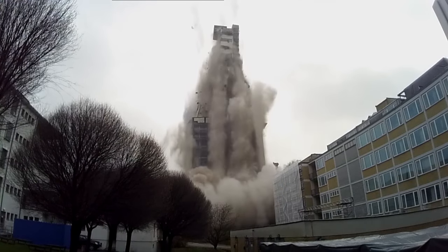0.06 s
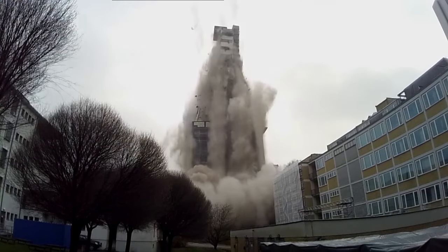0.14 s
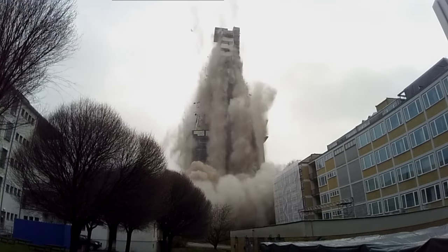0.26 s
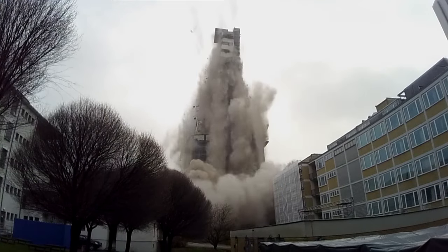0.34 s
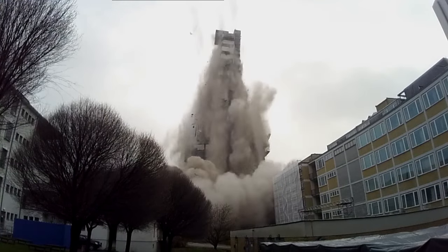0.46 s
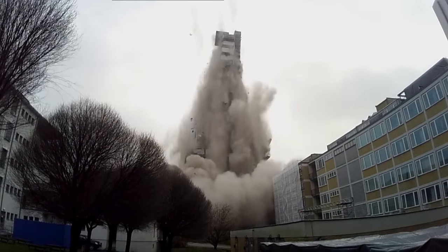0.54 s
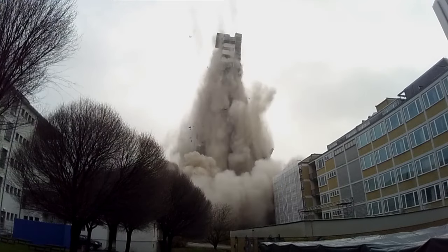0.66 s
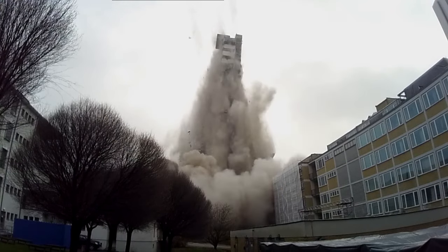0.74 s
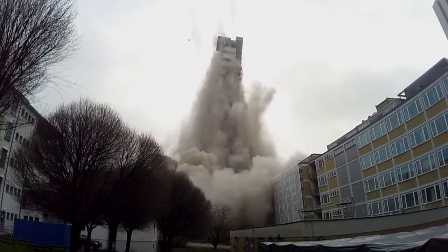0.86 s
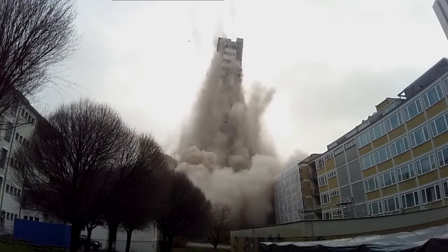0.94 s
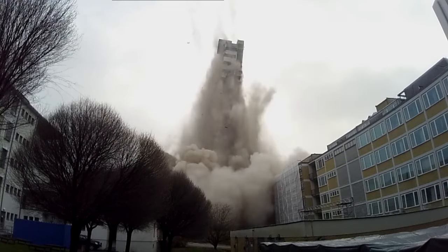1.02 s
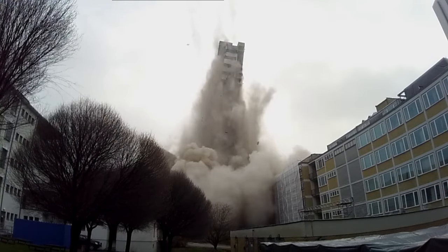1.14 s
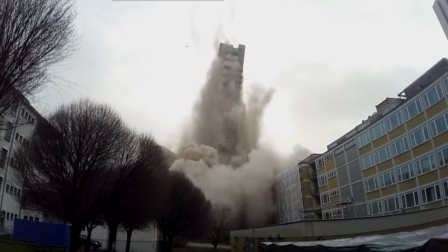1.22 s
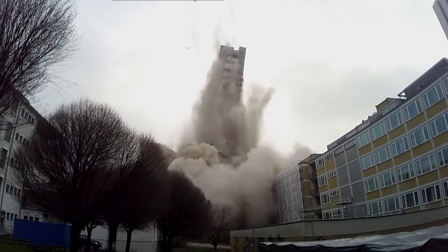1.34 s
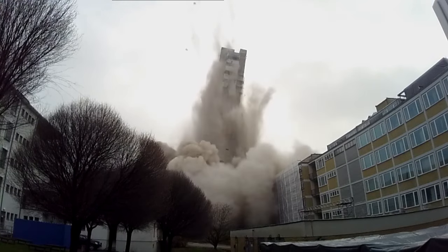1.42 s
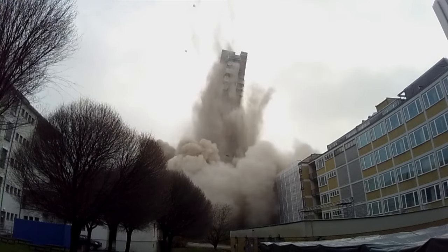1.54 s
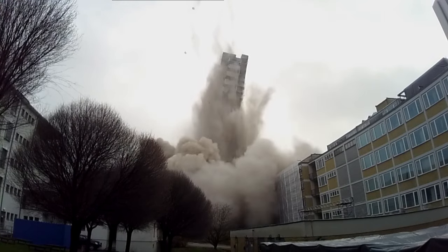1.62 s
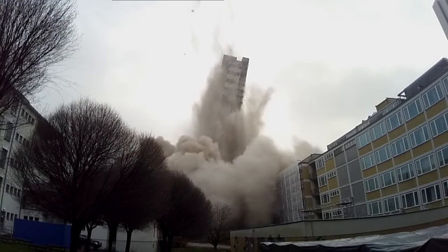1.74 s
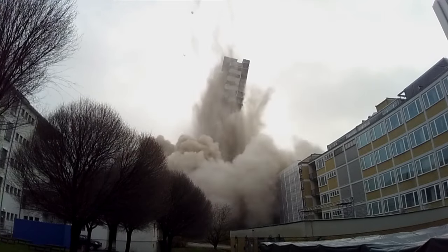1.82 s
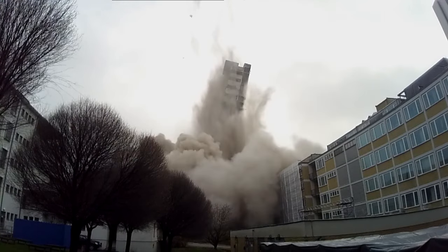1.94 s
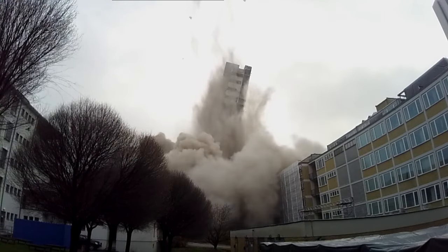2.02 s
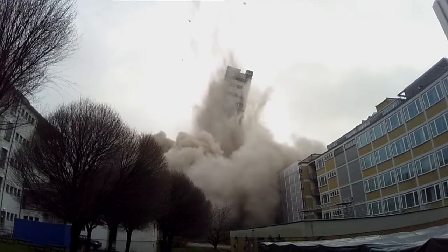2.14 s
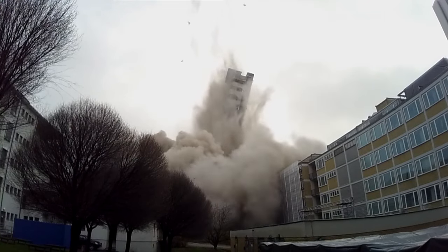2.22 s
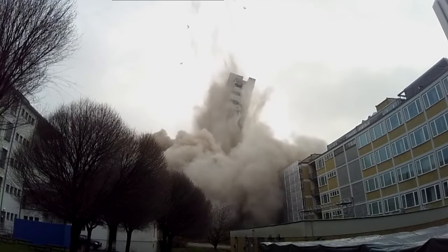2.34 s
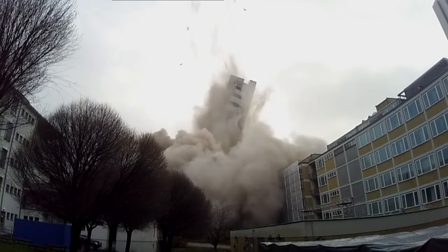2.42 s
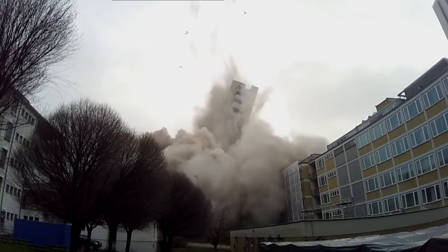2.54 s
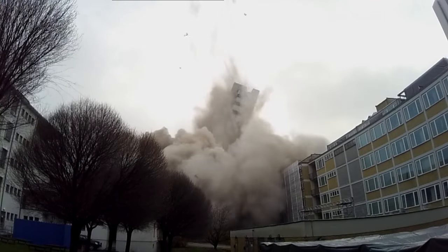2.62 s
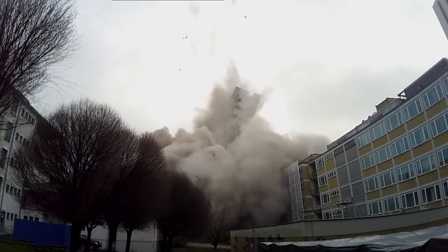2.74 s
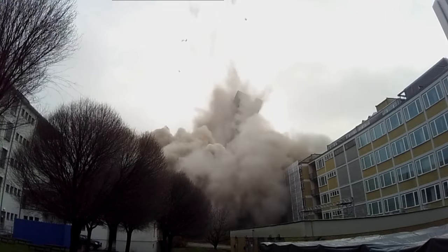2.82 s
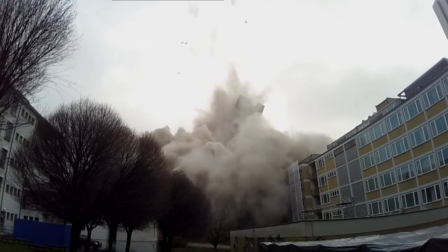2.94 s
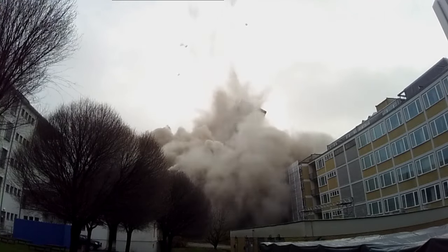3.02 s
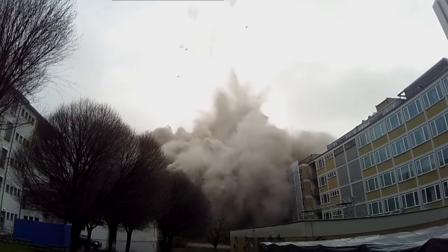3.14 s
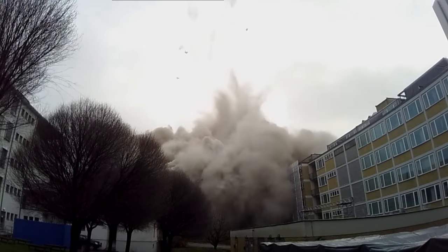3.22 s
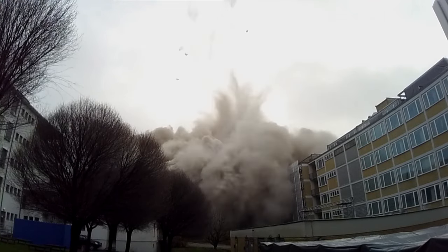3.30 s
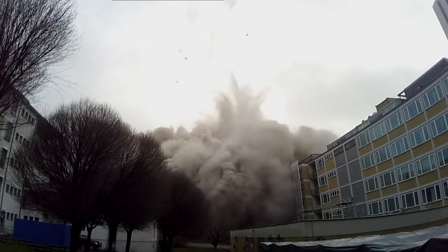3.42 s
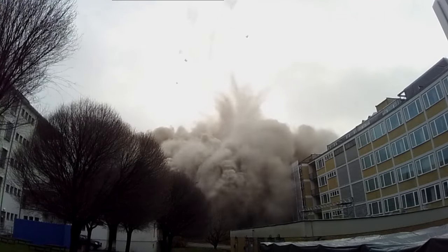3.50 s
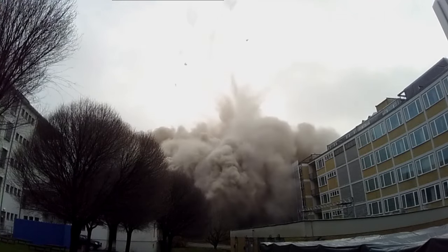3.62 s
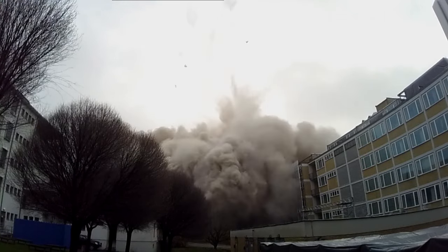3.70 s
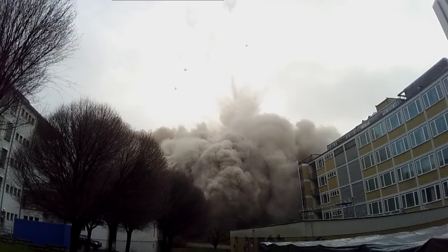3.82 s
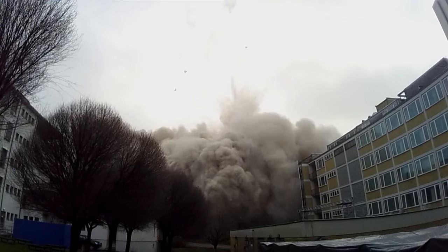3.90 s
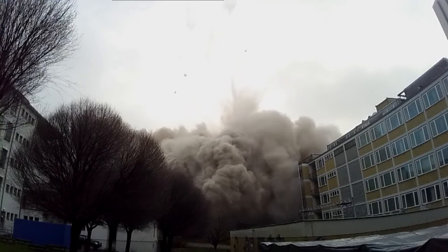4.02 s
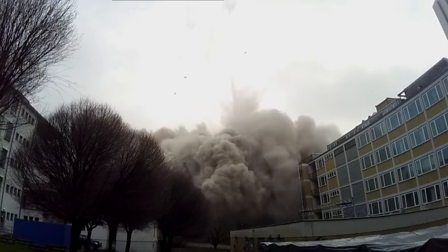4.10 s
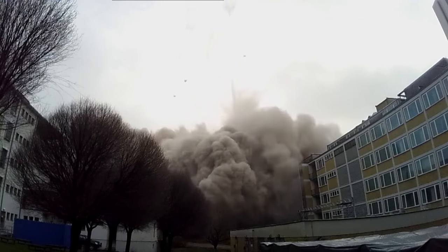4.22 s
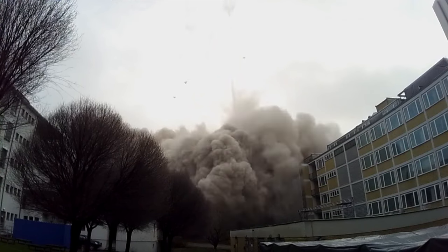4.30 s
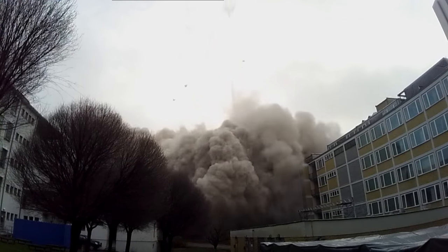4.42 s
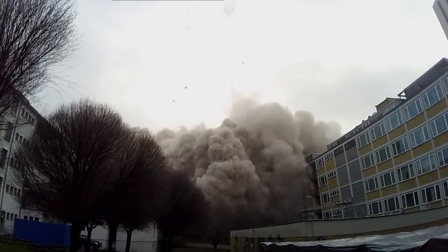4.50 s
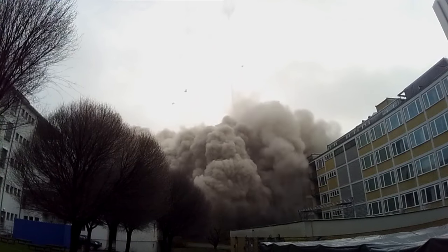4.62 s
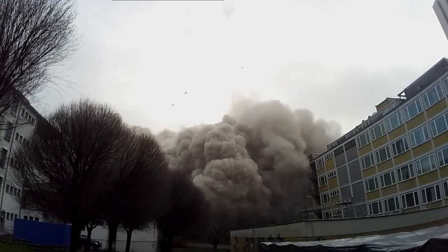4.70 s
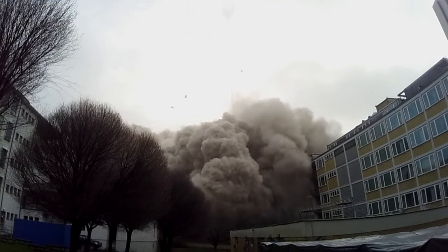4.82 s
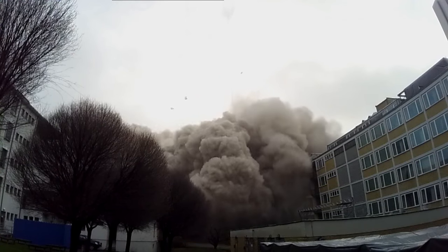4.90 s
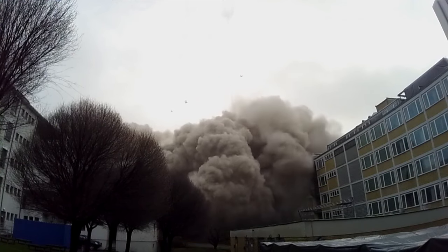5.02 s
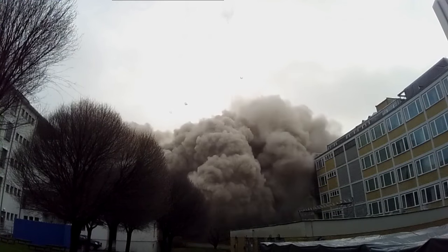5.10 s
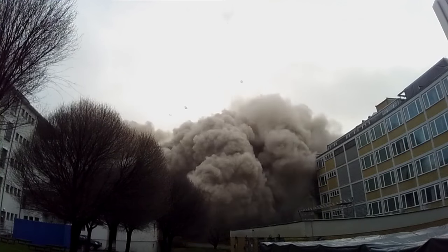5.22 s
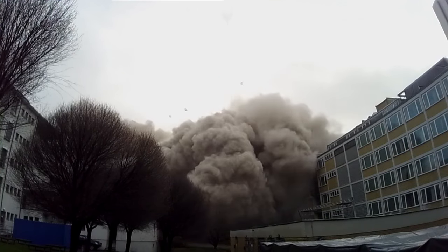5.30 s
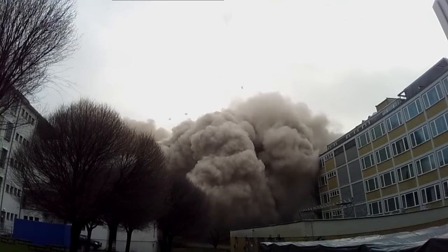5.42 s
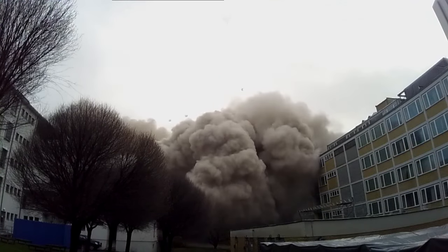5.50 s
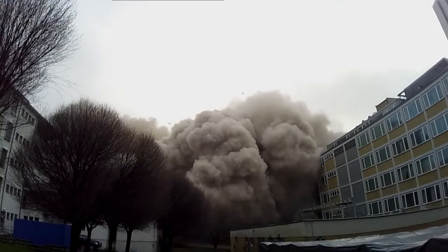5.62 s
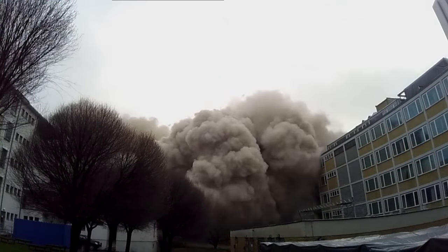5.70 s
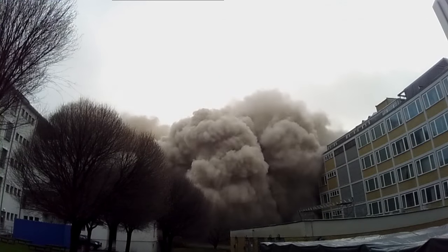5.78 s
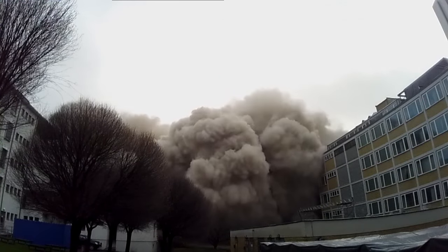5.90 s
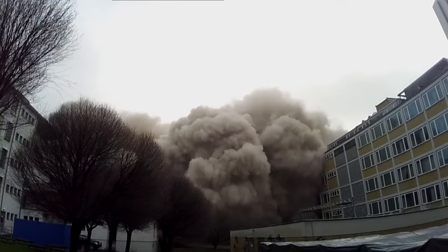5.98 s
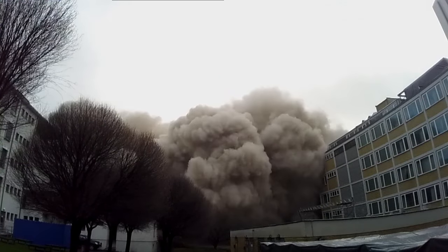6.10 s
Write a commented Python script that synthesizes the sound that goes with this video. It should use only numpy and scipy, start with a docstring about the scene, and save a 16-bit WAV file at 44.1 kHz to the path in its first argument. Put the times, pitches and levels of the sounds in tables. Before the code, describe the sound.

A concrete tower collapses with a loud, distorted, crackling roar that eases into rumbling and thuds of falling rubble.

```python
"""A blasted concrete tower collapses, heard from the city street on one overloaded camera microphone.
Breaking slabs roar, smash, crunch and thud; behind them the ground rumbles and rubble hisses.
At first the roar slams the diaphragm from stop to stop and tears into hard crackling pulses,
then smooths as it eases. Slow pressure surges pin the diaphragm against its stop and choke
the sound for moments: the longer, the deeper."""
import sys
import numpy as np
from scipy.fft import rfft, irfft, next_fast_len
from scipy.io import wavfile
from scipy.ndimage import uniform_filter1d, map_coordinates

SR = 44100
rng = np.random.default_rng(int(sys.argv[2]) if len(sys.argv) > 2 else 0)


def transcribe(u):
    """Save the signal u as a 16-bit wav file named by the first command-line argument.

    u: samples, shape (n,) or (channels, n), limited to [-1, 1]; the rate is SR.
    q: integer samples, one column per channel.
    """
    v = np.clip(np.atleast_2d(u).T, -1, 1)
    q = np.round(v * 32767).astype(np.int16)
    wavfile.write(sys.argv[1], SR, q)


N = 271212

# Colour of each noise at the microphone: frequency_hz, relative_db (per Hz)
RUMBLE_SPECTRUM = [(15, -19), (30, -15), (55, -3), (88, -0.5), (120, -4), (200, -36.5), (600, -95)]
TUMBLE_SPECTRUM = [(60, -19), (130, -13.5), (210, 0.5), (330, -1.5), (500, -2.5), (900, -20.5), (2500, -31)]
RUBBLE_SPECTRUM = [(200, -44), (700, -2.5), (1500, 4), (2500, 4), (4000, 2.5), (4900, -4), (6000, 1),
                   (8000, -11.5), (12000, -54.5)]
DEBRIS_SPECTRUM = [(1000, -24), (3000, -15), (5000, -8.5), (6500, -3.5), (8000, -11), (12000, -21.5)]
THUD_SPECTRUM = [(80, -27), (180, -10), (290, 4), (450, -1.5), (800, -20), (2500, -49.5)]
CRUNCH_SPECTRUM = [(300, -22), (900, -0.5), (1600, -0.5), (2800, -10.5), (4500, -14), (9000, -43)]
SMASH_SPECTRUM = [(200, -17.5), (400, -4), (750, 0.5), (1150, -8), (1700, -16.5), (4000, -32), (9000, -51)]
HEAVE_SPECTRUM = [(2, -14), (8, -4), (25, 2), (50, -6), (120, -55), (300, -120)]
ROAR_SPECTRUM = [(20, -12), (50, 5.5), (100, -1), (150, -5), (230, -4), (400, -10.5), (700, -12),
                 (1100, -13.5), (1600, -20), (2500, -29.5), (4500, -34), (9000, -47)]
# Showers of fine debris: start_s, length_s, level_db
DEBRIS_SHOWERS = [(3.487, .09, -28), (3.623, 0.045, -29)]

# In the next four tables, 0 dB is the pressure that takes the diaphragm to its stop.
# Heavy slabs landing: start_s, level_db
SLAB_LANDINGS = [(3.15, -5.5), (3.42, -11), (3.995, -4.5), (4.14, -5), (5.379, -14)]
# Bursts of crushed concrete: middle_s, half_length_s, level_db
CONCRETE_CRUNCHES = [(.2, 0.16, -0.5), (.46, 0.055, 10), (.8, 0.11, 2.5), (1.15, 0.14, -1), (1.45, 0.14, 0),
                     (2.22, .06, -10), (2.53, .05, -2.5), (2.7, 0.06, -7), (3.05, 0.22, -19),
                     (3.38, 0.046, -16)]
# Whole floors smashing: middle_s, half_length_s, level_db
FLOOR_SMASHES = [(.14, .05, 12), (.825, .036, 18), (2.28, .052, -2), (2.76, .15, -8.5), (3.05, .17, -10.5),
                 (4.22, .07, -7), (5.245, .025, -12), (5.358, .01, -11), (5.407, .021, -10.5)]
# The tower's roar and the slow heave of the air: time_s, roar_db, heave_db
COLLAPSE_LEVELS = [(0, 16, 3), (.6, 20.5, 2), (1.05, 18, 2.5), (1.6, 12.5, -1), (2.35, 10, 1),
                   (2.95, 0, -24), (3.5, -1, -14), (3.63, -4.5, -9.5), (3.85, 0.5, 0.5), (4.25, -3, -2),
                   (5.05, -5, -18), (5.15, -7, -4), (5.3, -9, -11), (5.7, -3.5, -4), (5.95, -6, -7.5),
                   (6.15, -6, -4)]

# Big surges that pin the diaphragm: start_s, length_s, depth_db
BIG_SURGES = [(.024, .008, 20), (.058, .007, 22), (.07, .01, 19), (.17, .007, 17), (.234, .007, 19),
              (.308, .006, 18), (.325, .006, 18), (.379, .006, 22), (.42, .006, 18), (.433, .008, 12),
              (.744, .006, 18), (.855, .007, 20), (.887, .006, 16), (.894, .009, 20), (.906, .007, 15),
              (.93, .006, 18), (.939, .007, 19), (.957, .006, 16), (.984, .007, 17), (1.011, .01, 17),
              (1.024, .006, 26), (1.031, .006, 15), (1.085, .01, 21), (1.115, .008, 18), (1.126, .008, 19),
              (1.136, .01, 20), (1.172, .01, 16), (1.211, .007, 20), (1.234, .015, 21), (1.259, .006, 20),
              (1.279, .008, 19), (1.311, .01, 22), (1.323, .009, 17), (1.362, .007, 17), (1.434, .01, 19),
              (1.456, .006, 18), (1.564, .009, 21), (1.579, .011, 17), (1.64, .009, 16), (1.665, .006, 17),
              (1.794, .06, 23), (1.933, .014, 23), (2.047, .008, 18), (2.074, .009, 19), (2.149, .013, 19),
              (2.219, .008, 18), (2.379, .016, 17), (2.431, .017, 20), (2.474, .007, 15), (2.626, .005, 16),
              (2.672, .009, 16), (3.299, .005, 17), (3.622, .005, 14), (3.788, .007, 18), (4.126, .006, 15),
              (4.304, .005, 18), (5.109, .006, 14), (5.146, .009, 14), (5.162, .011, 19), (5.184, .011, 19),
              (5.201, .02, 45), (5.227, .006, 22), (5.264, .023, 25), (5.294, .029, 58), (5.33, .028, 58),
              (5.364, .01, 23), (5.429, .005, 16), (5.44, .021, 27), (5.473, .007, 16), (5.504, .019, 21),
              (5.549, .009, 18), (5.578, .009, 17), (5.626, .008, 16), (5.676, .008, 11), (5.691, .017, 20),
              (5.719, .014, 22), (6.029, .005, 16), (6.037, .005, 18)]

TIME_S = np.arange(N) / SR


def amp(db):
    """Decibels to gain."""
    return 10 ** (np.asarray(db) / 20)


def unit(x):
    """x at rms 1."""
    return x / np.sqrt(np.mean(x ** 2) + 1e-20)


def curves(rows):
    """One value per sample for each column after the time."""
    times, *columns = np.transpose(rows)
    return [np.interp(TIME_S, times, column) for column in columns]


def wobble(rate):
    """A smooth random curve, rate knots a second."""
    return map_coordinates(rng.standard_normal(int(N * rate / SR) + 4), [TIME_S * rate])


def swells(rows):
    """Gain of bell-shaped swells from rows of middle_s, half_length_s, level_db."""
    return sum(amp(db) * np.exp(-((TIME_S - middle) / half) ** 2) for middle, half, db in rows)


def filtered(x, response):
    """x times a complex response of frequency."""
    size = next_fast_len(N + SR // 2)
    return irfft(rfft(x, size) * response(np.fft.rfftfreq(size, 1 / SR)), size)[:N]


def noise(spectrum):
    """Noise of rms 1 with the given colour."""
    knots_hz, db = np.transpose(spectrum)
    colour = lambda hz: amp(np.interp(np.log(hz + 1), np.log(knots_hz), db))
    return unit(filtered(rng.standard_normal(N), colour))


def saturate(x, hardness):
    """Linear when small, flattening towards plus and minus 1."""
    return x / (1 + np.abs(x) ** hardness) ** (1 / hardness)


def ground_rumble():
    """The street shakes as the air heaves."""
    _, heave_db = curves(COLLAPSE_LEVELS)
    return amp(-42.5 + 0.31 * heave_db) * noise(RUMBLE_SPECTRUM)


def tumbling_slabs(peak_s=4.42, rise_db_per_s=2.5, ebb_db_per_s=9):
    """Slabs tumble onto the heap in one long swell."""
    late_s = TIME_S - peak_s
    level_db = -31.5 + np.minimum(rise_db_per_s * late_s, -ebb_db_per_s * late_s)
    return amp(level_db) * noise(TUMBLE_SPECTRUM)


def rubble_hiss(grainy_db=1.5, down_s=3.07, settle_db_per_s=2.5):
    """Countless small fragments hiss and rattle with the roar, and settle once the tower is down."""
    roar_db, _ = curves(COLLAPSE_LEVELS)
    settled_db = settle_db_per_s * np.maximum(TIME_S - down_s, 0)
    grains = unit(amp(grainy_db * wobble(400)) * noise(RUBBLE_SPECTRUM))
    return amp(-31.5 + 0.057 * roar_db - settled_db) * grains


def debris_showers(fade_db=2.5):
    """Fine debris sprays down in short bright bursts."""
    level = np.zeros(N)
    for start, length, db in DEBRIS_SHOWERS:
        age_s = TIME_S - start
        gate = np.interp(age_s, [0, 0.011, length / 2, length + 0.015], [0, 1, 1, 0])
        level += gate * amp(db - fade_db * np.clip(age_s / length, 0, 1))
    return level * noise(DEBRIS_SPECTRUM)


def slab_thuds(rise_s=0.012, fall_db_per_s=116):
    """Heavy slabs land on the heap, each with a dull blow that dies quickly."""
    level = np.zeros(N)
    for start, db in SLAB_LANDINGS:
        age_s = np.maximum(TIME_S - start, 0)
        level += np.minimum(age_s / rise_s, 1) * amp(db - fall_db_per_s * age_s)
    return level * noise(THUD_SPECTRUM)


def concrete_crunches(gritty_db=4.5):
    """Concrete is crushed in gritty bursts."""
    return swells(CONCRETE_CRUNCHES) * unit(amp(gritty_db * wobble(500)) * noise(CRUNCH_SPECTRUM))


def tower_collapse(lumpy_db=1, crackly_db=1):
    """Pressure at the microphone: slabs roar and break over the slow heave of the air they push aside."""
    roar_db, heave_db = curves(COLLAPSE_LEVELS)
    roar = amp(roar_db + lumpy_db * wobble(25) + crackly_db * wobble(450)) * noise(ROAR_SPECTRUM)
    smashes = swells(FLOOR_SMASHES) * noise(SMASH_SPECTRUM)
    impacts = smashes + concrete_crunches() + slab_thuds()
    heave = amp(heave_db) * noise(HEAVE_SPECTRUM)
    return roar + impacts + heave


def small_surges(typical_s=0.0024, depth_db=10, slots=300):
    """Brief chance surges, more frequent as the roar grows: rows of start_s, length_s, depth_db."""
    roar_db, _ = curves(COLLAPSE_LEVELS)
    offset, luck, size = rng.random((slots, 3)).T
    onset = ((np.arange(slots) + offset) * N / slots).astype(int)
    rate_per_s = 3 * amp(0.4 * roar_db[onset])
    happens = luck < rate_per_s * N / SR / slots
    length_s = typical_s * np.exp(0.45 * (2 * size - 1))
    return np.column_stack([onset / SR, length_s, np.full(slots, depth_db)])[happens]


def diaphragm_freedom(hold_s=0.015, sink_db_per_s=2200, ragged_db=1, edge_s=0.001):
    """Gain of 1 between surges, a weak flutter while one pins the diaphragm, sinking to 0 if it lasts."""
    pinned_db = np.zeros(N)
    for start, length, depth_db in [*BIG_SURGES, *small_surges()]:
        span = slice(int(start * SR), int((start + length) * SR))
        sunk_db = sink_db_per_s * np.maximum(TIME_S[span] - start - hold_s, 0)
        pinned_db[span] = np.minimum(pinned_db[span], -depth_db - sunk_db)
    flutter_db = (pinned_db < 0) * ragged_db * wobble(300)
    free = amp(np.minimum(pinned_db + flutter_db, 0))
    return uniform_filter1d(free, int(edge_s * SR))


def bass_cut(x, corner_hz=331, q=0.65):
    """The microphone's low cut turns each slam from stop to stop into a short pulse with an undershoot."""
    return filtered(x, lambda hz: -hz ** 2 / (corner_hz ** 2 - hz ** 2 + 1j * hz * corner_hz / q))


def amplifier(swing, drive_db=0.5, height_db=-11, edge_hz=7000):
    """The amplifier flattens the tallest pulses to one height and rounds their edges."""
    flat = amp(height_db) * saturate(amp(drive_db) * swing, hardness=7.3)
    return filtered(flat, lambda hz: 1 / (1 + 1j * hz / edge_hz))


def scene():
    """The collapse from the street, near enough to overload the microphone."""
    travel = saturate(tower_collapse(), hardness=2.05)  # the diaphragm's stops lie at -1 and 1
    free = diaphragm_freedom()
    pulses = amplifier(bass_cut(free * travel))
    squeeze = 1 - 0.15 * travel ** 2  # the hiss dips whenever the diaphragm nears a stop
    fragments = squeeze * rubble_hiss() + debris_showers()
    ground = ground_rumble() + tumbling_slabs()
    choke_share = 0.82  # the fragments suffer only this share of a choke's depth in dB
    return (pulses + free ** choke_share * fragments + free * ground)[None]


def record(dry, band_hz=8100, top_hz=15600):
    """The camera takes one channel and passes only a trace of the top octave."""
    band = lambda hz: 1 / (1 + (hz / band_hz) ** 140)
    trace = lambda hz: amp(-26.5) / (1 + (hz / 13500) ** 8)
    return filtered(dry[0], lambda hz: (band(hz) + trace(hz)) * (hz < top_hz))[None]


dry = scene()
out = record(dry)
transcribe(out)
```